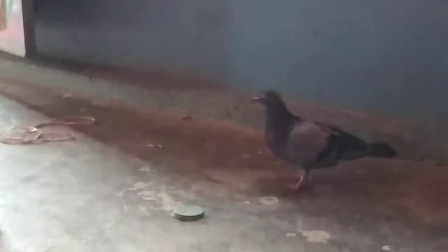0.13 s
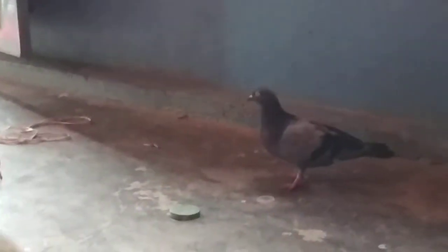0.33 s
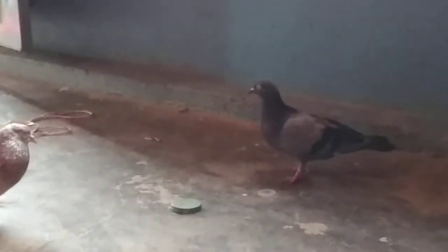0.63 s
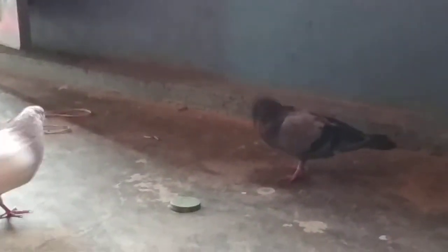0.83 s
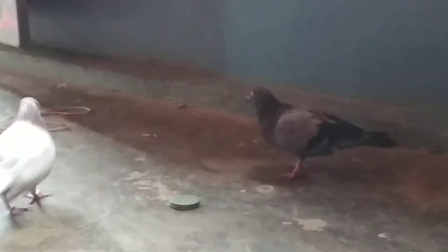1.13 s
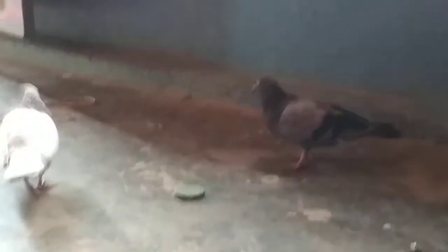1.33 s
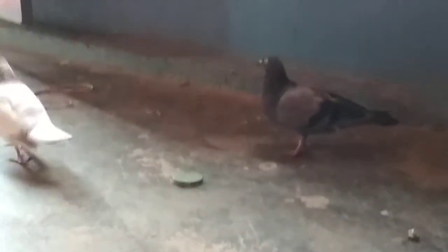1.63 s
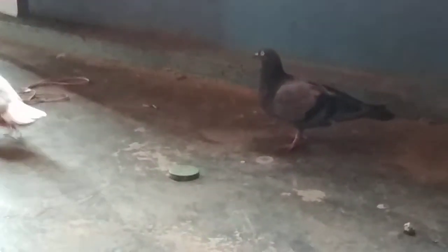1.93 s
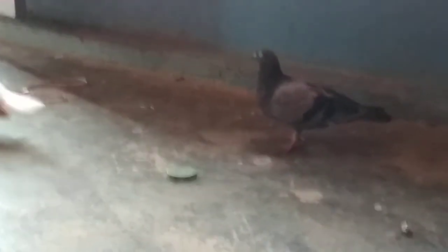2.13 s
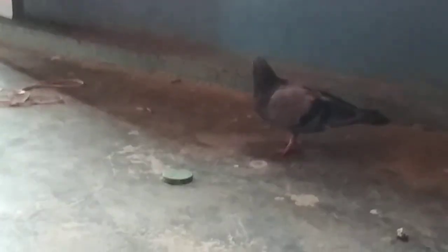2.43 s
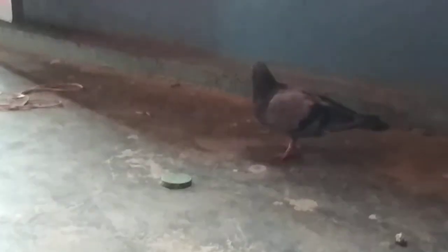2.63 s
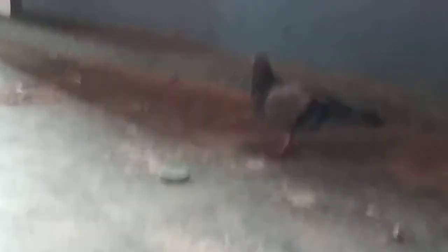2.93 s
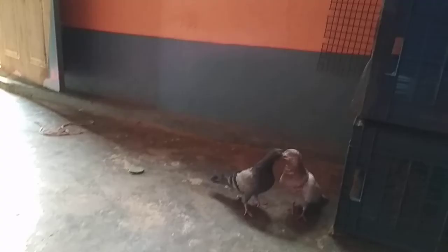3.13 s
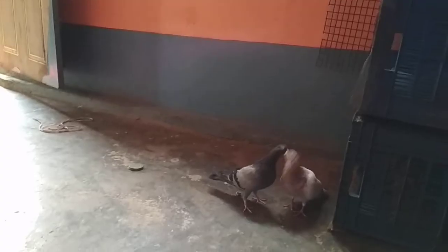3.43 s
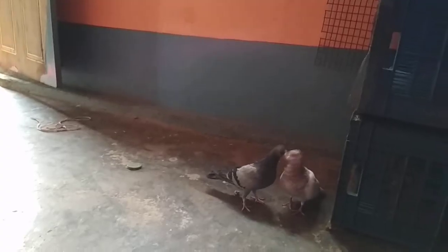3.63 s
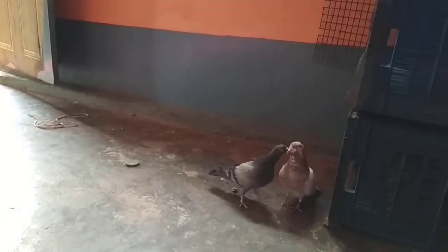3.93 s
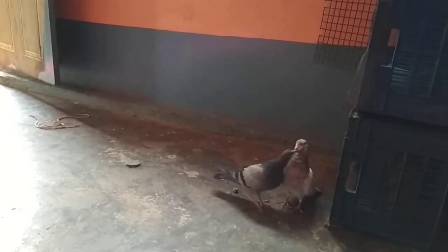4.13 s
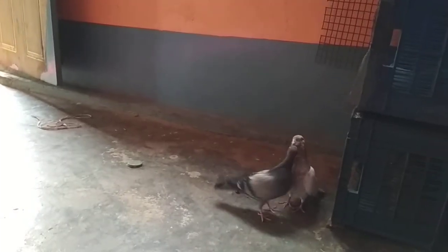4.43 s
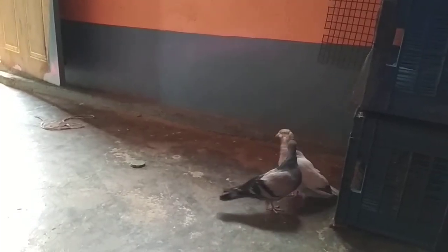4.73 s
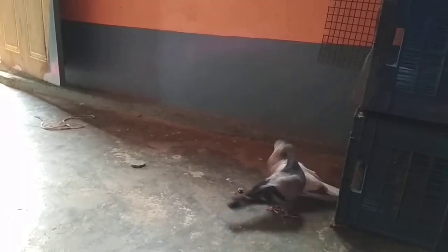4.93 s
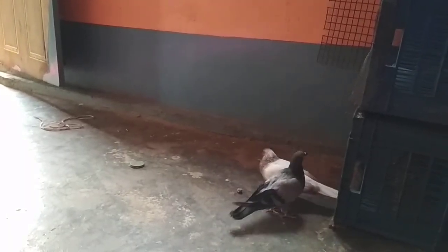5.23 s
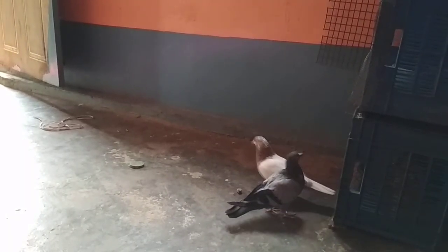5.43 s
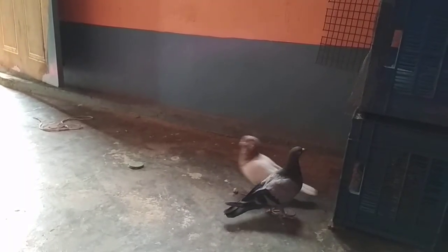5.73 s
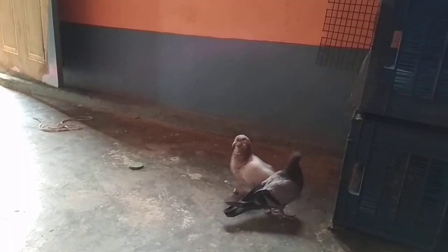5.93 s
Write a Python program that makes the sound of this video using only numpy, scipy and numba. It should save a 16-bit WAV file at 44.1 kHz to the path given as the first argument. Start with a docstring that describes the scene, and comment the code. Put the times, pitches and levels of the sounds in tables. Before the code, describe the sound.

Pigeons coo from the start, a metre or two from the microphone in a bare, slightly echoing room. Their low, muffled calls mix arching tones, rolling trills and short throat puffs over an uneven growl. The cooing is strong in the first half second, eases, then swells from about 1.1 to 1.8 seconds and from 2.2 to 3.5. A faint motor hum, a pulsing cricket and tiny far calls come from outdoors, with a soft scuff near 2 seconds. A faint buzzy call runs from 2.5 to 3.1 seconds; as it stops, the hum drops and the coos turn duller. A small bird gives two quiet falling chirps at 3.5 and 3.9. The pigeons pause from about 4 to 4.7 seconds, leaving light claw ticks and feather rustles. Cooing then resumes until the end at 6 seconds, with six thin, quiet rising peeps behind it.

```python
"""A bare room with a hard floor; pigeons coo a metre or two from a phone held low.
Near birds give chest tones with overtones, rolling trills and short puffs that ring the throat.
The flock growls behind: uneven pulses through throat resonances. Claws tick, feathers rustle.
A cricket, small birds and far calls sound from outdoors over a motor hum.
At 3.1 s the phone is moved: the hum drops, a buzzy call stops, the throats lose upper partials."""
import sys
import numpy as np
from scipy import signal
from scipy.io import wavfile
from scipy.ndimage import uniform_filter1d
from numba import njit

SR = 44100
rng = np.random.default_rng(int(sys.argv[2]) if len(sys.argv) > 2 else 0)


def file_out(sig):
    """Save sig as 16-bit WAV at sys.argv[1]."""
    # one column per channel
    cols = np.atleast_2d(sig).T
    # limit, then scale
    lim = np.clip(cols, -1, 1)
    pcm = np.round(lim * 32767).astype(np.int16)
    wavfile.write(sys.argv[1], SR, pcm)


N = 268039
T = np.arange(N) / SR

MOVE_S, LEFT_LAG_SAMPLES, TOP_HZ = 3.11, 10, 15650
CROP_HZ = 1000  # the swollen crop muffles all above
THIRD_DB, THIRD_MOVED_DB = -21.5, -38  # partial 3 re partial 2, before / after the move
UPPER_DB, UPPER_MOVED_DB = -16.5, -39.5  # upper throat re growl, before / after the move

# room tail bands: f/Hz, t60/s, relative level/dB
ROOM_BANDS = [(214, 0.65, 8), (359, 0.5, 6), (760, 0.46, 0.5), (1760, 0.39, -11), (2730, 0.78, -7),
              (10000, 0.74, -3.5)]
# balance of distant sound at the two microphone ports: f/Hz, left-right/dB
PORT_BALANCE = [(500, 2), (1200, 6), (4000, 4), (8000, -10), (12000, -8)]
# still-air spectrum: f/Hz, relative density/dB
AIR_SPECTRUM = [(30, 12.5), (42, 8), (60, -1), (110, -4.5), (250, -7.5), (500, -9.5), (900, -10),
                (1400, -17), (2400, -17.5), (3500, -24.5), (5200, -27.5), (7000, -24.5), (9000, -24),
                (11300, -16), (13000, -27.5), (15000, -40)]
# motor hum: t/s, level/dB
HUM_LEVELS = [(0, -52.5), (.23, -68.5), (.42, -60.5), (.72, -74.5), (.85, -58.5), (1.05, -73.5), (1.1, -61),
              (1.67, -59.5), (1.89, -69.5), (2.05, -58.5), (2.34, -71), (3.08, -56.5), (3.12, -77),
              (4.2, -85.5), (6, -76)]
# cricket bouts: start/s, end/s, period/s, level/dB
CRICKET_BOUTS = [(-.065, .25, 0.16, -72), (0.953, 1.9, .158, -77), (2.357, 3.1, 0.16, -75.5),
                 (3.076, 4.05, .163, -80), (5.016, 6.01, 0.16, -79)]
# feathers and feet all round: t/s, level/dB
STIR_LEVELS = [(0.0, -91), (0.32, -75.5), (0.52, -98.5), (1.59, -99.5), (2.03, -91), (4.03, -84),
               (4.5, -85), (5.28, -78), (6.08, -82)]
# narrow far calls: t/s, length/s, start f/Hz, end f/Hz, level/dB, drop/dB
NARROW_CALLS = [(0.117, 0.29, 5284, 5280, -70.5, 19.5), (1.04, 0.16, 11040, 11350, -70.5, 19),
                (0.229, .2, 2620, 2625, -78.5, 3), (0.368, .14, 2150, 2160, -84.5, 1),
                (.4, .1, 3880, 3880, -86.5, 3), (0.708, 0.064, 2100, 2060, -82.5, 2),
                (1.0, 0.14, 2040, 2204, -84.5, -1.5), (1.36, 0.17, 1880, 1870, -84, -0.5),
                (1.57, .12, 2050, 2123, -84.5, 0), (2.271, 0.067, 2130, 2170, -85, 0),
                (2.447, 0.068, 3670, 3590, -86, 0), (2.652, 0.075, 3130, 3140, -82.5, 5),
                (1.626, 0.063, 2834, 3040, -89, 2), (1.786, 0.052, 3500, 3500, -86, 2),
                (2.192, 0.067, 2800, 2910, -83.5, 4), (1.945, 0.072, 2900, 2940, -87.5, 5),
                (2.295, .03, 3300, 3330, -88, 1.5), (2.378, 0.046, 3250, 3248, -88.5, 4),
                (3.105, 0.071, 5300, 5240, -82, 4), (3.397, 0.081, 3230, 3200, -82, -5),
                (3.779, 0.07, 3150, 3210, -78, -2.5), (3.79, 0.042, 1604, 1560, -78, 8),
                (4.114, 0.07, 476, 487, -63, 3), (4.132, .16, 273, 276, -61.5, 6),
                (5.698, .25, 1045, 1035, -79.5, 4)]
# faint breathy notes; the one at 5.36 s is an overtone of the near pigeon's coo, about 1 kHz:
# t/s, length/s, start f/Hz, end f/Hz, width/Hz, level/dB, drop/dB
BREATHY_NOTES = [(.5, 0.87, 1420, 1500, 130.3, -74, 0), (1.1, .2, 1337, 1403, 110, -73, 4),
                 (1.35, 1.074, 1522, 1545, 140, -74.5, 0), (1.66, 0.19, 1400, 1400, 110, -78, 3),
                 (4.116, 0.17, 968, 962, 160, -82.5, 1), (4.375, 0.26, 1050, 980, 169, -70.5, 4),
                 (4.438, 0.15, 1450, 1410, 260, -83, 3.5), (5.36, 0.19, 1003, 970, 120, -75.5, 1.5)]
# rustles, scuffs, a thump: t/s, length/s, f/Hz, width/Hz, level/dB, drop/dB
RUSTLES = [(.035, .47, 11700, 3700, -74, 10), (.105, .36, 2900, 500, -81, 1),
           (.232, .08, 1900, 760, -73, 9), (0, .5, 1015, 764, -73.5, -3), (.678, .07, 3520, 3020, -79, 14),
           (.68, .24, 1056, 650, -61.5, 21), (1.077, .79, 1138, 884, -73, 9.5),
           (1.235, .1, 4890, 503, -79, 1), (1.932, .22, 870, 319, -52.5, 17),
           (2.775, .2, 2930, 348, -78, 10), (2.596, .15, 11380, 500, -83.5, -4),
           (2.76, .23, 11970, 510, -81, -3.5), (3.04, .048, 11200, 6000, -74.5, -3),
           (3.1, .32, 2450, 480, -73, 7), (3.806, .016, 70, 60, -54, 1), (3.958, .35, 2450, 900, -75.5, 1),
           (4.113, .22, 3860, 1810, -71, 16.5), (4.12, .15, 9400, 7240, -77, 10),
           (5.075, .19, 1100, 576, -77.5, 0), (.14, .32, 3700, 900, -88, 3),
           (5.5, .6, 4300, 1200, -89, 2.5), (6.004, .042, 10200, 4550, -58, -3.5),
           (6.0, .07, 14000, 3000, -68, -3), (6.008, .07, 2660, 1650, -69.5, -6),
           (5.994, .07, 6260, 2200, -72.5, -8.5)]
# buzzy call: t/s, f/Hz, level/dB
BUZZ_CONTOUR = [(2.539, 200.8, -67.5), (2.67, 203.3, -61.5), (2.78, 192.1, -59.5), (2.9, 198.8, -61),
                (3.0, 197.3, -60), (3.101, 196, -57)]
# small bird, peeps: t/s, start f/Hz, end f/Hz, level/dB
RISING_PEEPS = [(4.765, 3110, 3346, -75), (4.99, 2977, 3330, -67.5), (5.208, 2950, 3234, -61.5),
                (5.432, 2954, 3196, -64), (5.676, 2970, 3110, -64), (5.9, 2950, 3070, -64.5)]
# small bird, chirps: t/s, level/dB
FALLING_CHIRPS = [(3.488, -62), (3.85, -62.5)]
# claws and beaks on the floor: t/s, level/dB, f/Hz, t60/s, left-right/dB
FLOOR_TICKS = [(0.684, -75, 9800, 0.3, -1), (1.798, -84, 7300, 0.18, 0), (3.099, -67.5, 5220, 0.05, -1),
               (3.864, -85.5, 11300, 0.42, -7), (3.9474, -76, 10430, 0.089, -12.5),
               (4.476, -68, 8050, 0.35, -4), (4.73, -70, 9030, 0.46, -4.5), (4.94, -83, 10300, 0.38, -8),
               (5.015, -80.5, 8500, 0.36, -13.5), (5.034, -77.5, 11600, 0.24, -19.5),
               (5.212, -75, 9800, 0.094, 0)]
# bands of a tick: ratio to its centre, relative level/dB
TICK_RINGS = [(.5, -13), (.72, -4.5), (1.01, 4), (1.3, -2), (1.65, -7.5)]
# pigeon position: t/s, left-right/dB
PIGEON_PAN = [(0, 0.5), (.5, -1), (1.6, -1), (2.2, -2), (2.9, -1.5), (4, -0.5), (5.2, -1.5), (6.08, -1)]
# flock growl, one list a spell: t/s, level/dB, throat f/Hz
GROWL_SPELLS = [
    [(0, -37.5, 376.5), (.15, -42, 386.5), (.29, -32.5, 328.5), (.65, -53, 399), (.8, -50.5, 326.6),
     (1.07, -52, 296), (1.13, -50.5, 322), (1.41, -41, 452), (1.67, -41, 327.7), (1.89, -61.5, 354.3),
     (1.96, -49, 419.6), (2.17, -52.5, 327.5), (2.3, -51, 325), (2.49, -41.5, 425.5), (2.66, -43, 413.5),
     (2.8, -55.5, 406), (3.02, -50.5, 303.3), (3.3, -42.5, 329), (3.55, -69, 342), (3.7, -69, 373.3),
     (3.93, -65.5, 356), (4.06, -100, 312)],
    [(4.745, -71.5, 490), (4.77, -52.5, 463), (4.98, -52.5, 324), (5.09, -44.5, 432), (5.17, -51.5, 341.5),
     (5.46, -40.5, 380.5), (5.7, -48.5, 325.7), (5.8, -47.5, 396), (6.08, -39.5, 333.5)],
]
# flock grunts in the upper throat: t/s, level/dB
FLOCK_GRUNTS = [(0, -56), (.22, -69.5), (.69, -66), (.79, -49.5), (1.12, -50.5), (1.67, -59), (1.94, -65.5),
                (2.231, -51), (2.74, -48), (3.12, -63.5), (3.28, -65.5), (4.759, -66), (5.07, -53),
                (5.45, -64.5)]
# single throat puffs: t/s, level/dB, f/Hz
THROAT_PUFFS = [(0.039, -21.5, 391), (.07, -20, 368.6), (.196, -18.5, 327), (.386, -19.5, 270.5),
                (1.094, -28, 245), (1.142, -26, 698), (1.266, -22.5, 349.6), (1.355, -20, 431),
                (1.507, -23, 443), (1.536, -15.5, 317), (1.602, -21, 309), (1.65, -21.5, 266),
                (1.783, -31.5, 266), (1.828, -30.5, 246), (2.209, -27.5, 272), (2.374, -20, 376.5),
                (2.437, -35, 383), (2.459, -16.5, 419.4), (2.522, -28.5, 389), (2.549, -35, 410),
                (2.61, -27.5, 277), (2.73, -27, 266), (3.113, -28.5, 412), (3.229, -17.5, 349),
                (3.411, -28, 304.4), (3.467, -28, 323), (3.537, -41, 413), (3.697, -31.5, 375),
                (3.765, -33.5, 350), (3.802, -36, 349), (4.765, -34, 506), (4.89, -33.5, 342),
                (4.918, -33.5, 380), (4.947, -39, 365), (5.217, -32.5, 230), (5.272, -31, 598),
                (5.337, -24, 307.6)]
# first pigeon, short coos: start/s, peak/s, end/s, f/Hz at each of the three,
# partial 1 level/dB, partial 2 level/dB, trill depth (0-1)
CHEST_COOS = [(.67, .76, 0.81, 208.3, 216.6, 202, -51.5, -39, 0.24),
              (.8, .812, 0.9, 262, 269.6, 264, -40.5, -53, 0.28),
              (1.08, 1.098, 1.126, 275, 271.7, 274, -42, -41.5, 0.11),
              (1.87, 1.93, 2.1, 218.5, 212.4, 206.2, -51.5, -40.5, 0.27),
              (2.19, 2.25, 2.31, 257.5, 250, 256, -49, -44, 0.36),
              (3.1, 3.116, 3.116, 216.4, 215, 211, -48, -32.5, .1),
              (3.18, 3.21, 3.25, 214.3, 220.8, 212.6, -62.5, -31.5, .1),
              (3.26, 3.285, 3.34, 212.7, 210.8, 210, -61.5, -35, .2),
              (4.94, 5.03, 5.13, 224.8, 228.3, 222, -50.5, -58.5, .3)]
# second pigeon, no overtones: start/s, peak/s, end/s, f/Hz at each, level/dB, trill depth (0-1)
ROLLING_COOS = [(0, .04, 0.4, 323, 359.4, 351, -38, 0.42), (.78, .794, 0.9, 703, 684, 717, -45, 0.6),
                (.79, .81, 0.96, 796, 797, 782, -46.5, 0.17),
                (1.138, 1.146, 1.205, 674, 686, 680, -38.5, 0.35),
                (1.26, 1.27, 1.29, 367, 369, 398, -30, 0.5),
                (1.32, 1.395, 1.57, 364.4, 435.7, 446, -33, 0.55),
                (1.49, 1.54, 1.8, 427.3, 426, 419, -35.5, 0.46),
                (1.25, 1.27, 1.29, 784, 778, 760, -48, 0.14),
                (1.27, 1.36, 1.43, 495.6, 529.6, 560, -44, 0.53), (1.36, 1.4, 1.52, 757, 735, 660, -52, .3),
                (2.24, 2.255, 2.33, 766, 740, 685, -46.5, 0.28),
                (2.37, 2.44, 2.68, 339.3, 401, 420.5, -38.5, 0.86),
                (2.48, 2.495, 2.53, 421, 429, 372, -43.5, 0.54),
                (2.36, 2.385, 2.63, 769, 740, 716, -51, 0.3),
                (2.455, 2.465, 2.51, 780, 783, 760, -48, 0.21),
                (2.73, 2.77, 2.88, 771, 773, 762, -51.5, .3),
                (3.13, 3.17, 3.2, 303.7, 299.2, 290, -34.5, 0.2),
                (3.25, 3.33, 3.406, 299.8, 310.8, 314, -34, 0.78),
                (3.36, 3.44, 3.53, 322.3, 309.1, 297, -44, 0.62),
                (5.07, 5.11, 5.21, 669.6, 685, 678.5, -45, 0.041),
                (5.36, 5.405, 5.48, 366, 345, 351, -36, 0.44),
                (5.445, 5.46, 5.51, 309, 309.5, 310, -33, 0.18),
                (5.58, 5.605, 5.63, 323, 327, 318, -34, 0.11),
                (5.63, 5.66, 5.73, 311, 310.3, 300, -33, 0.3),
                (5.93, 5.99, 6.07, 348.6, 339, 335, -43.5, 0.3),
                (5.995, 6.04, 6.12, 481, 410, 371, -42, .2), (5.0, 5.025, 5.11, 430.6, 414.3, 384, -45, .2)]
# first pigeon, one list a long coo: t/s, f/Hz, partial 1 level/dB, partial 2 level/dB
ARCHING_COOS = [
    [(.17, 307.7, -43, -54), (.21, 308.2, -36, -49), (.27, 281.9, -33, -43), (.31, 268.5, -28.5, -37.5),
     (.37, 250.4, -34.5, -36.5), (.43, 234.5, -45.5, -42.5), (.52, 226.3, -51, -48)],
    [(1.49, 237, -47.5, -50), (1.53, 249.6, -39.5, -41.5), (1.6, 251, -42, -35), (1.655, 263.4, -36, -38.5),
     (1.7, 270, -41, -38), (1.76, 266.6, -54, -51.5), (1.83, 264, -55, -54)],
    [(2.6, 269, -54, -54), (2.634, 256.7, -37, -37), (2.67, 238.6, -52.5, -40.5), (2.71, 258, -38, -38.5),
     (2.75, 278.3, -33.5, -38.5), (2.79, 274.8, -48, -34.5), (2.82, 269.9, -48, -56.5),
     (2.88, 276.1, -45, -48), (2.95, 268, -56, -61)],
    [(3.51, 226.2, -50.5, -65), (3.55, 212.3, -50.5, -47.5), (3.61, 197.7, -52.5, -41),
     (3.65, 206.9, -53, -46.5), (3.68, 221.8, -50, -49), (3.71, 206.5, -60.5, -47.5), (3.74, 200, -60, -59)],
    [(5.345, 228.2, -57, -46.5), (5.374, 240.7, -52, -33.5), (5.408, 261.2, -56, -35),
     (5.45, 232.6, -53.5, -35.5), (5.49, 240, -45.5, -44.5), (5.56, 237, -54, -51.5)],
    [(5.7, 241.3, -57, -54), (5.73, 238.9, -45, -40.5), (5.79, 224.8, -42.5, -38.5),
     (5.835, 248.8, -48.5, -44.5), (5.89, 260.2, -46.5, -44), (5.945, 258.7, -36, -39.5),
     (5.99, 264.8, -32, -48), (6.08, 251.7, -38, -56)],
]


def undb(db):
    """dB to gain."""
    return 10 ** (np.asarray(db) / 20)


def unit(x):
    """Scale to rms 1."""
    return x / np.sqrt(np.mean(x ** 2))


def curve(table, at=T):
    """Interpolate a two-column table."""
    return np.interp(at, *np.transpose(table))


def cycles(hz):
    """Running cycle count."""
    return np.cumsum(hz) / SR


@njit
def svf(x, hz, width_hz):
    """State-variable band-pass; moving centre, peak gain 1."""
    y, band_state, low_state = np.empty(len(x)), 0., 0.
    for i in range(len(x)):
        g, damping = np.tan(np.pi * hz[i] / SR), width_hz / hz[i]
        v = (band_state + g * (x[i] - low_state)) / (1 + g * (g + damping))
        band_state = 2 * v - band_state
        low_state += 2 * g * v
        y[i] = damping * v
    return y


def band(x, hz, width_hz, stages=1):
    """Steep band-pass; two resonances a stage."""
    hz = np.clip(hz + np.zeros(len(x)), 20, .45 * SR)
    for _ in range(2 * stages):
        x = svf(x, hz, float(width_hz))
    return x


def walk(rate_hz, size=N):
    """Smoothed random steps; spread near 1."""
    hold = int(SR / rate_hz)
    steps = np.repeat(rng.standard_normal(size // hold + 1), hold)
    return 1.3 * uniform_filter1d(uniform_filter1d(steps, hold), hold)[:size]


def fade(start_s, end_s, rise_s, fall_s):
    """Trapezoid envelope."""
    return np.clip(np.minimum((T - start_s) / rise_s, (end_s - T) / fall_s), 0, 1)


def burst(age_s, rise_s, t60_s, hold_s=0):
    """Linear rise, hold, exponential decay."""
    return np.clip(age_s / rise_s, 0, 1) * undb(-60 * np.maximum(age_s - rise_s - hold_s, 0) / t60_s)


def pan(x, db):
    """Stereo, left minus right = db."""
    return x * undb(np.multiply.outer([.5, -.5], np.atleast_1d(db)))


def patchy(centres_hz, gains, flicker_db, rate_hz, rel_width):
    """Noise bands flickering independently; bass more alike at both ports; rms 1."""
    out = np.zeros((2, N))
    for hz, gain in zip(centres_hz, gains):
        mid, side = (band(n, hz, hz * rel_width) for n in rng.standard_normal((2, N)))
        side *= np.clip(hz / 900, .35, 1)
        ports = pan(np.array([mid + side, mid - side]), curve(PORT_BALANCE, hz))
        out += gain * undb(flicker_db * walk(rate_hz)) * ports
    return unit(out)


def strands(hz, width_hz, size):
    """Stereo noise band of 1-6 narrow rings, each swelling on its own."""
    count = int(np.clip(width_hz // 260, 1, 6))
    offsets = (np.arange(count) + .5 + (count > 1) * rng.uniform(-.4, .4, count)) / count - .5
    ring_width_hz = width_hz * (1.4 if count == 1 else 2 / count)
    spread_db = 2.2 if count == 1 else 4
    out = np.zeros((2, size))
    for offset in offsets:
        centre_hz = hz + .9 * offset * width_hz
        ring = [unit(band(n, centre_hz, ring_width_hz, stages=2)) for n in rng.standard_normal((2, size))]
        out += np.array(ring) * undb(spread_db * walk(26, size))
    return out / np.sqrt(count)


def room(x, direct_db, tail_db):
    """Direct sound, late at the left port, plus a dense stereo tail."""
    t = T[:SR // 2]
    tail = np.zeros((2, len(t)))
    for hz, t60_s, db in ROOM_BANDS:
        shared, left, right = (band(n, hz, hz) for n in rng.standard_normal((3, len(t))))
        alike = min(250 / hz, 1)  # long waves reach both ports alike
        decay = undb(-60 * t / t60_s) * np.clip(t / .0045 - .5, 0, 1)
        ports = (alike * shared + (1 - 1.13 * alike) * np.array([left, right])) * decay
        tail += undb(db) * ports / np.sqrt(np.sum(ports ** 2) / 2) * np.sqrt(hz / 10000)  # even per Hz
    direct = np.array([np.roll(x, LEFT_LAG_SAMPLES), x])
    wet = signal.fftconvolve(x[None], tail, axes=1)[:, :N]
    return undb(direct_db) * direct + undb(tail_db) * wet


def still_air(level_db=-80):
    """Bass-heavy, flickering noise floor."""
    hz = np.geomspace(25, 13000, 32)
    knots_hz, knots_db = np.transpose(AIR_SPECTRUM)
    gains = undb(np.interp(np.log(hz), np.log(knots_hz), knots_db))
    return undb(level_db) * patchy(hz, gains, flicker_db=4, rate_hz=16, rel_width=.2)


def motor_hum():
    """Wavering hum: noise bands at 85 and 140 Hz."""
    mid, side, high = rng.standard_normal((3, N))
    low = np.array([unit(band(mid + k * side, 85, 76, stages=2)) for k in (.3, -.3)])
    hum = low + undb(-.5) * unit(band(high, 140, 72))
    return pan(hum, 4) * undb(curve(HUM_LEVELS))


def cricket():
    """Narrow ring pulsed in bouts; each chirp has a short outdoor tail."""
    ring = np.array([unit(band(n, 6720, 140)) for n in rng.standard_normal((2, N))])
    level = np.zeros(N)
    for start_s, end_s, period_s, db in CRICKET_BOUTS:
        last_s = start_s + period_s * ((end_s - start_s) // period_s)
        age_s = np.where(T > end_s, T - last_s, (T - start_s) % period_s)
        level += undb(db) * burst(age_s, rise_s=.038, t60_s=.29, hold_s=.028) * (T > start_s)
    return pan(ring, .55) * level


def feather_stir():
    """Feathers and feet all round: flickering treble noise."""
    hz = np.geomspace(1300, 6000, 22)
    stir = patchy(hz, (hz / 1700) ** -1.2, flicker_db=7.5, rate_hz=11, rel_width=.08)
    return stir * undb(curve(STIR_LEVELS))


def noise_notes(notes, rise_s):
    """Gliding noise bands; rows as in BREATHY_NOTES."""
    out = np.zeros((2, N))
    for start_s, length_s, start_hz, end_hz, width_hz, db, drop_db in notes:
        now = slice(int(start_s * SR), int((start_s + length_s) * SR) + SR // 10)
        progress = np.clip((T[now] - start_s) / length_s, 0, 1)
        hz = start_hz + (end_hz - start_hz) * progress
        gate = fade(start_s, start_s + length_s + .053, rise_s, .063)[now]
        ports = pan(strands(hz, width_hz, len(hz)), curve(PORT_BALANCE, start_hz))
        out[:, now] += undb(db - drop_db * progress) * gate * ports
    return out


def far_calls():
    """Narrow calls that ease in; wider at higher pitch."""
    notes = [(start_s, length_s, start_hz, end_hz, 87 + .0087 * start_hz, db, drop_db)
             for start_s, length_s, start_hz, end_hz, db, drop_db in NARROW_CALLS]
    return noise_notes(notes, rise_s=.03)


def breathy_notes():
    """Faint noise bands near 1-1.5 kHz; the last is an overtone of the near pigeon's coo."""
    return noise_notes(BREATHY_NOTES, rise_s=.03)


def rustles():
    """Rustles, scuffs and a thump: noise bands with steady centres."""
    notes = [(start_s, length_s, hz, hz, *rest) for start_s, length_s, hz, *rest in RUSTLES]
    return noise_notes(notes, rise_s=.015)


def buzzy_call():
    """Rough pulses and breath through a wide, high throat."""
    knots_s, hz, db = np.transpose(BUZZ_CONTOUR)
    turns = cycles(np.interp(T, knots_s, hz) * (1 + .018 * walk(50)))
    pulses = unit(np.diff(np.floor(turns), prepend=0))
    source = pulses + .65 * rng.standard_normal(N)
    throat = unit(band(source, 900, 620, stages=2) + undb(-.5) * band(source, 1350, 330, stages=2))
    level = undb(np.interp(T, knots_s, db) + 2 * walk(14))
    return throat * level * fade(knots_s[0], knots_s[-1] + .0092, .12, .012)


def bird_peeps(length_s=.075):
    """Thin whistles that ease in and slide up."""
    out = np.zeros(N)
    for start_s, start_hz, end_hz, db in RISING_PEEPS:
        hz = np.interp(T, [start_s, start_s + .9 * length_s], [start_hz, end_hz])
        hz *= 1 + .004 * walk(80)
        level = undb(db + 2.5 * walk(60)) * fade(start_s, start_s + length_s, .02, .027)
        out += level * np.sin(2 * np.pi * cycles(hz))
    return out


def bird_chirps():
    """Whistles that hold, then drop an octave; overtones at the onset only."""
    out = np.zeros(N)
    for start_s, db in FALLING_CHIRPS:
        hz = np.interp(T - start_s, [0, .012, .049], [3560, 3400, 1650])
        phase = 2 * np.pi * cycles(hz)
        overtones = undb(-4.5) * np.sin(2 * phase) + undb(-6) * np.sin(3 * phase)
        onset = fade(start_s, start_s + .014, .0023, .0097)
        body = fade(start_s - .004, start_s + .051, .018, .0091) * undb(2.5 * walk(150))
        out += undb(db) * (body * np.sin(phase) + onset * overtones)
    return out


def claw_ticks():
    """Scrapes on the floor ring in five uneven bands; higher bands die sooner."""
    out, t = np.zeros((2, N)), T[:SR // 3]
    for start_s, db, hz, t60_s, pan_db in FLOOR_TICKS:
        at = int(start_s * SR)
        grit = undb(1.5 * walk(160, len(t)))
        for ratio, ring_db in TICK_RINGS:
            envelope = np.clip(t / .0089, 0, 1) * undb(-60 * t * ratio ** .37 / t60_s)
            centre_hz = min(ratio * hz, 12800)
            scrape = strands(centre_hz, .3 * centre_hz, len(t))
            out[:, at:at + len(t)] += undb(db + ring_db) * grit * envelope * pan(scrape, pan_db)
    return out


def flock_growl(pulses_per_s=1500):
    """Dense uneven pulses ring a moving throat, a low chest and an upper resonance."""
    mid, side = (rng.random((2, N)) < pulses_per_s / SR) * rng.standard_normal((2, N))
    knots_s, *columns = np.transpose(np.concatenate(GROWL_SPELLS))
    db, hz = (np.interp(T, knots_s, column) for column in columns)
    gate = sum(fade(spell[0][0] - .01, spell[-1][0] + .097, .014, .019) for spell in GROWL_SPELLS)
    grunts = sum(undb(grunt_db) * burst(T - start_s, rise_s=.0062, t60_s=.66)
                 for start_s, grunt_db in FLOCK_GRUNTS)
    upper_gain = undb(db + np.where(T < MOVE_S, UPPER_DB, UPPER_MOVED_DB)) + grunts
    out = []
    for pulses in (np.roll(mid, LEFT_LAG_SAMPLES) + .3 * side, mid - .3 * side):
        throat = unit(band(pulses, hz, 400, stages=3))
        chest = undb(-11.5) * unit(band(pulses, 245, 100, stages=2))
        upper = unit(band(band(pulses, 700, 470), 606, 350))
        out.append(gate * (undb(db) * (throat + chest) + upper_gain * upper))
    return np.array(out)


def throat_puffs(t60_s=.051):
    """Each puff rings the throat for a few cycles."""
    out, t = np.zeros(N), T[:SR // 5]
    envelope = (1 - np.exp(-t / .0022)) ** 2 * undb(-60 * t / t60_s)
    for start_s, db, hz in THROAT_PUFFS:
        at = int(start_s * SR)
        out[at:at + len(t)] += undb(db) * envelope * np.sin(2 * np.pi * hz * t)
    return out


def chest_tone(hz, partials_db):
    """Harmonics of a moving pitch at the given rms levels."""
    phase = 2 * np.pi * cycles(hz)
    return np.sqrt(2) * sum(undb(db) * np.sin(k * phase) for k, db in enumerate(partials_db, 1))


def throat_flutter(rate_hz, jitter):
    """Uneven flutter, 0-1."""
    return np.cos(np.pi * cycles(rate_hz * (1 + jitter * walk(16)))) ** 2


def short_coos(coos, trill_hz, wobble, swell_db, drop_db):
    """A wavering chest tone swells and sinks, chopped by the throat's flutter."""
    out = np.zeros(N)
    waver = 1 + wobble * walk(60) + .011 * walk(14)
    flutter = throat_flutter(trill_hz, jitter=.15)
    for start_s, peak_s, end_s, start_hz, peak_hz, end_hz, *partials_db, depth in coos:
        if len(partials_db) == 2:
            third_db = THIRD_DB if start_s < MOVE_S - .05 else THIRD_MOVED_DB
            partials_db.append(partials_db[1] + third_db)
        now = slice(max(int((start_s - .01) * SR), 0), int(end_s * SR))
        knots_s = [start_s, peak_s, end_s]
        hz = np.interp(T[now], knots_s, [start_hz, peak_hz, end_hz]) * waver[now]
        swell = undb(np.interp(T[now], knots_s, [-swell_db, 0, -drop_db]))
        gate = fade(start_s - .004, end_s, .0055, .032)[now]
        out[now] += chest_tone(hz, partials_db) * swell * (1 - depth * flutter[now]) * gate
    return out


def long_coos(trill_hz=49, depth=.28):
    """A chest tone on an arching pitch; partials 1 and 2 swell separately."""
    out = np.zeros(N)
    waver = 1 + .005 * walk(60) + .006 * walk(20)
    trill = 1 - depth * throat_flutter(trill_hz, jitter=.16)
    for coo in ARCHING_COOS:
        knots_s, *columns = np.transpose(coo)
        now = slice(int(knots_s[0] * SR), int(knots_s[-1] * SR))
        hz, first_db, second_db = (np.interp(T[now], knots_s, column) for column in columns)
        third_db = second_db + (THIRD_DB if knots_s[0] < MOVE_S else THIRD_MOVED_DB)
        tone = chest_tone(hz * waver[now], (first_db, second_db, third_db))
        out[now] += tone * (trill * fade(knots_s[0], knots_s[-1], .01, .0081))[now]
    return out


def near_pigeons():
    """Coos and puffs of two birds, muffled by the crop."""
    chest = short_coos(CHEST_COOS, trill_hz=45, wobble=.0026, swell_db=6.5, drop_db=10)
    rolls = short_coos(ROLLING_COOS, trill_hz=36, wobble=.0037, swell_db=10, drop_db=13)
    crop = signal.butter(4, (172, CROP_HZ), "band", fs=SR, output="sos")
    return signal.sosfilt(crop, chest + rolls + long_coos() + throat_puffs())


def scene():
    """Near pigeons, whistles and buzz through the room; the rest direct."""
    coos = room(near_pigeons(), direct_db=-1.5, tail_db=-13)
    chirps = room(bird_chirps(), direct_db=0, tail_db=8.5)
    peeps = room(bird_peeps(), direct_db=0, tail_db=3)
    before_move = np.clip((MOVE_S - T) / .01, 0, 1)
    buzz = room(buzzy_call(), direct_db=-2, tail_db=-.5) * before_move
    pigeons = pan(coos + flock_growl(), curve(PIGEON_PAN))
    faint = claw_ticks() + far_calls() + breathy_notes() + rustles()
    background = cricket() + motor_hum() + still_air() + feather_stir()
    return background + faint + buzz + peeps + chirps + pigeons


def record(dry):
    """The phone cuts the top."""
    return signal.sosfilt(signal.ellip(8, .2, 70, TOP_HZ, fs=SR, output="sos"), dry)


dry = scene()
out = record(dry)
file_out(out)
```